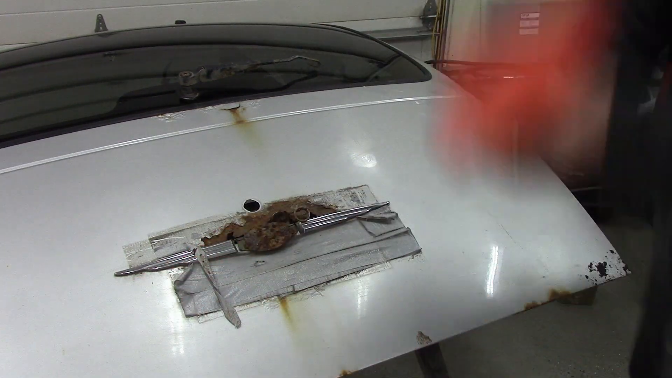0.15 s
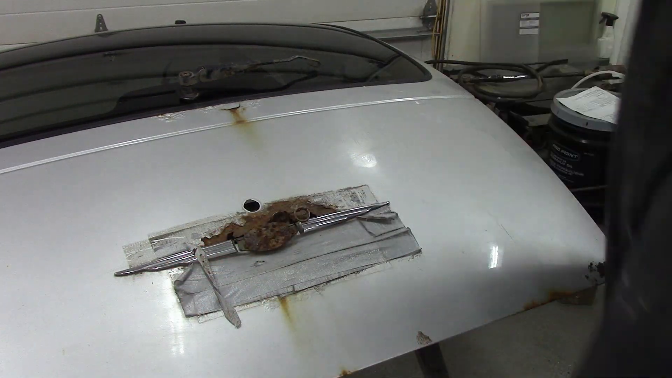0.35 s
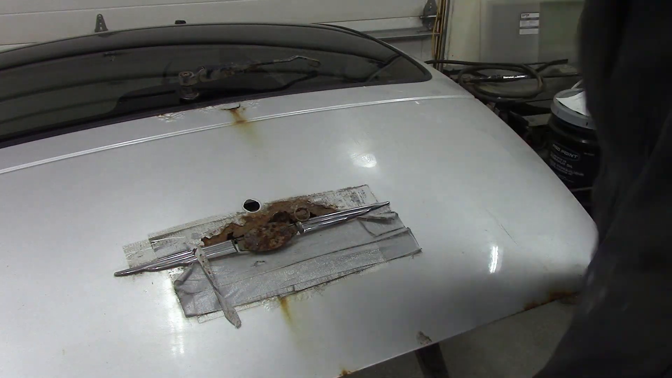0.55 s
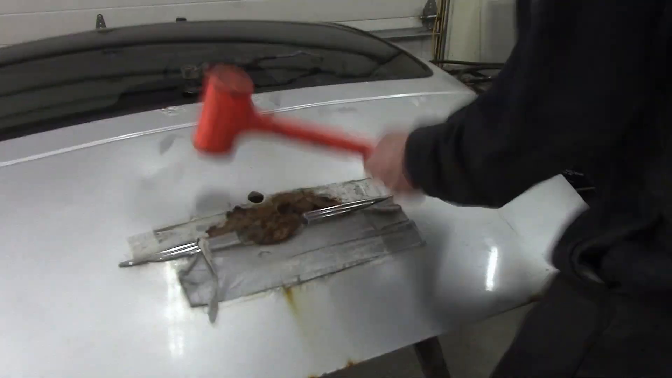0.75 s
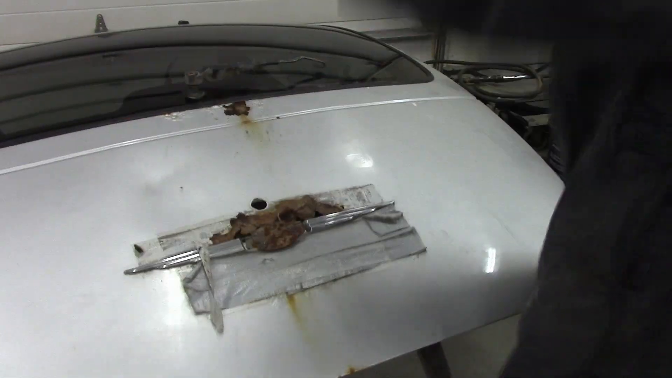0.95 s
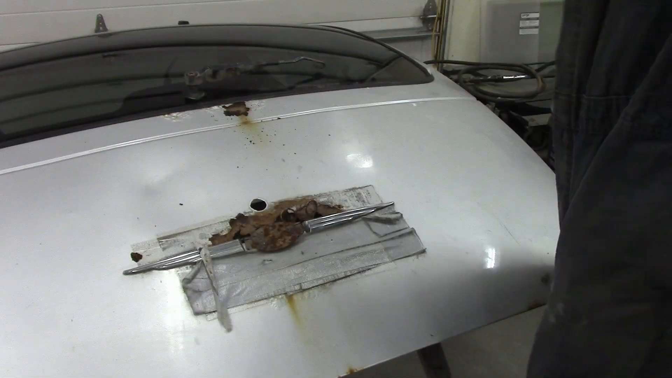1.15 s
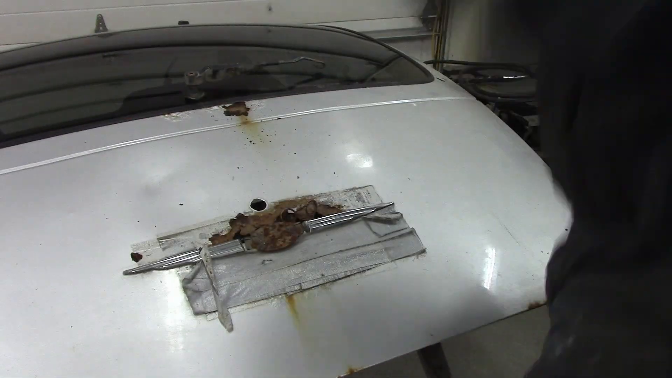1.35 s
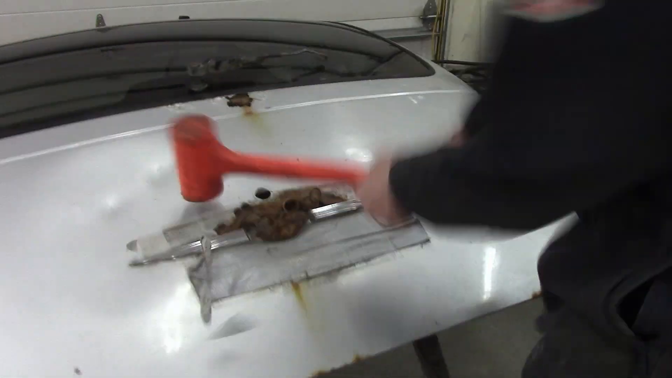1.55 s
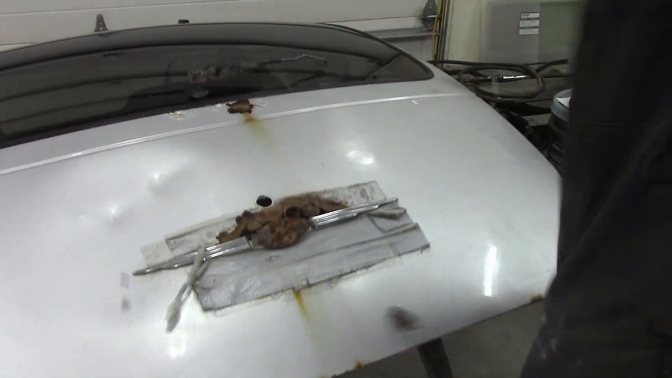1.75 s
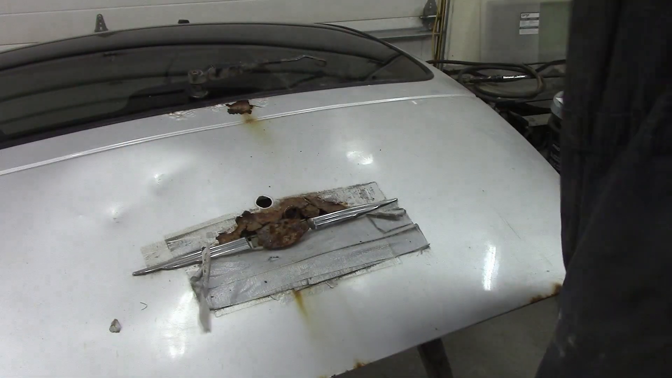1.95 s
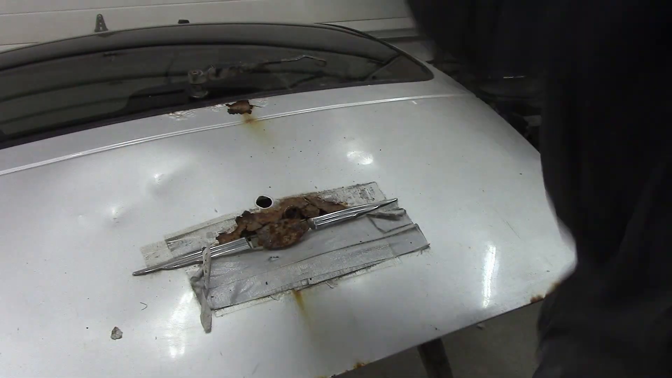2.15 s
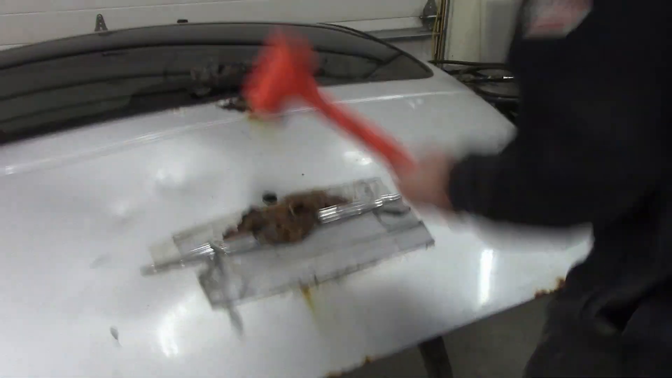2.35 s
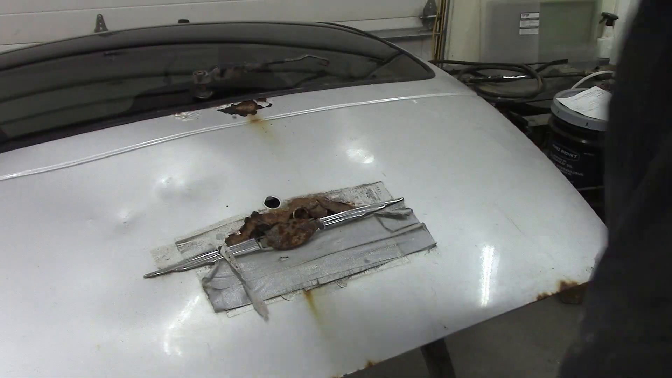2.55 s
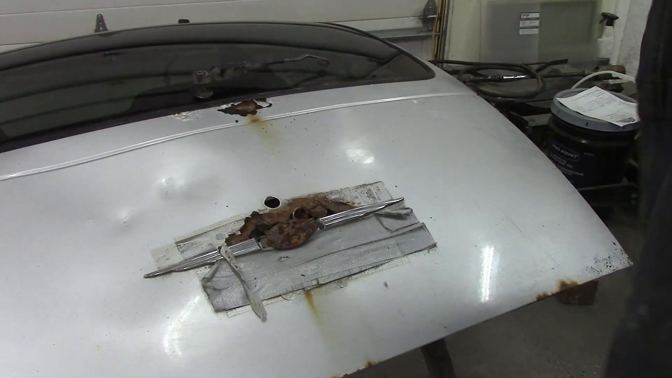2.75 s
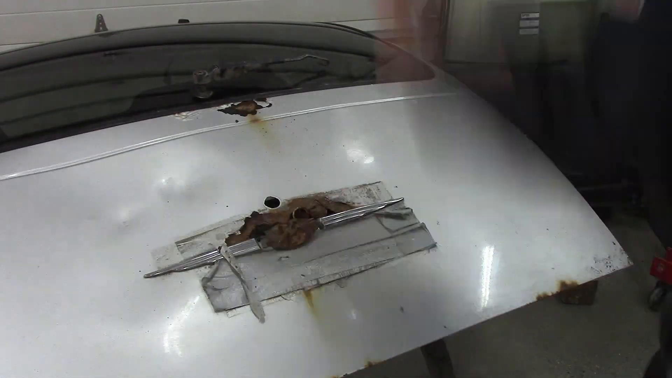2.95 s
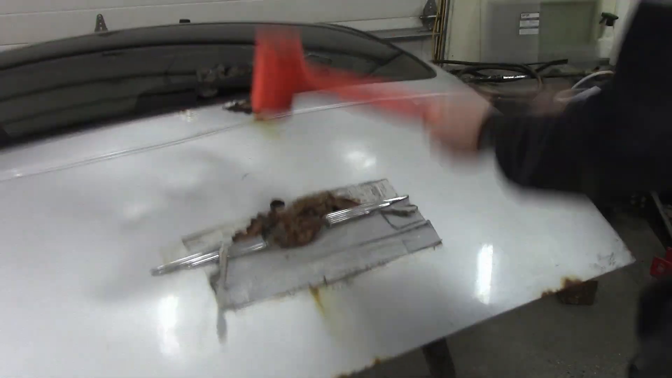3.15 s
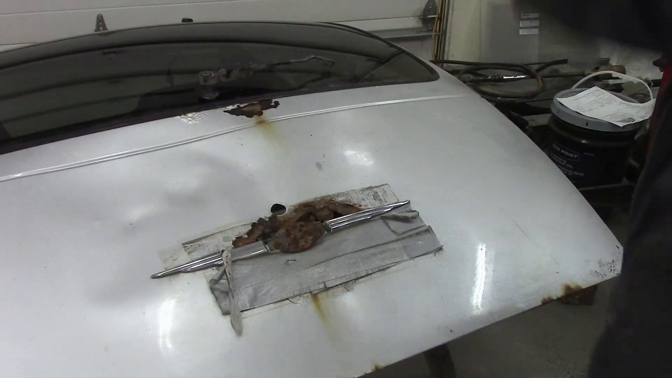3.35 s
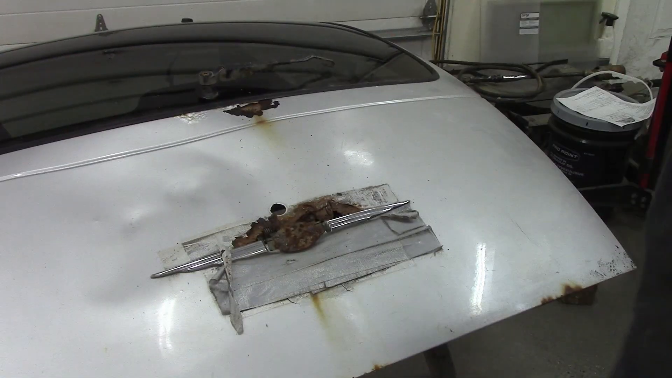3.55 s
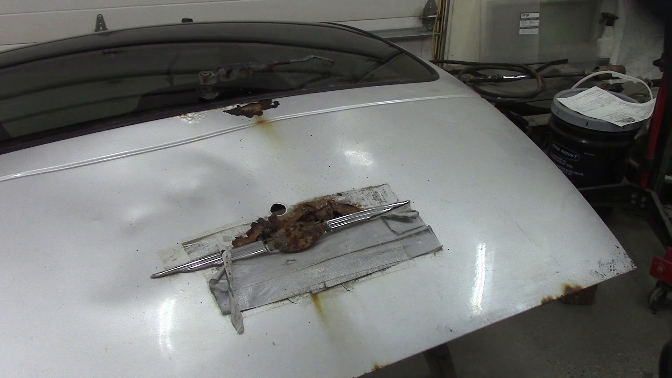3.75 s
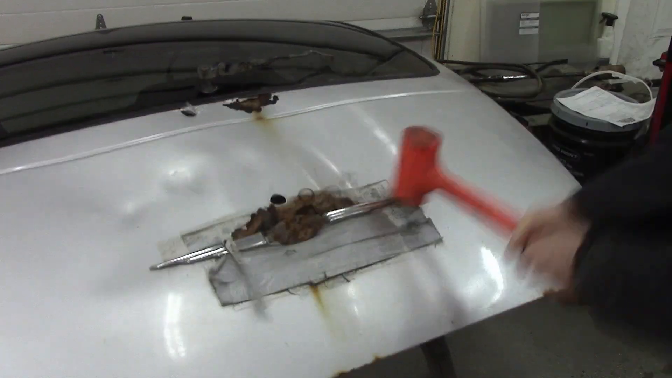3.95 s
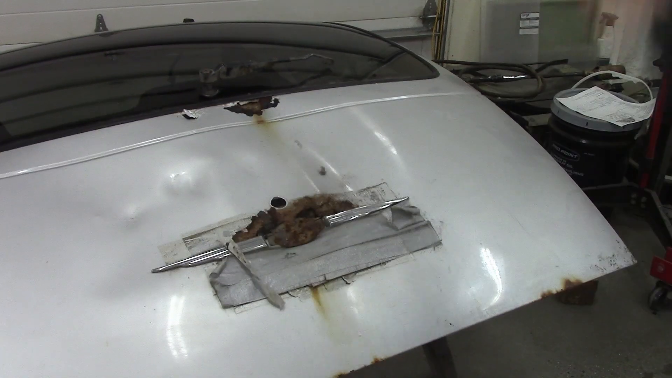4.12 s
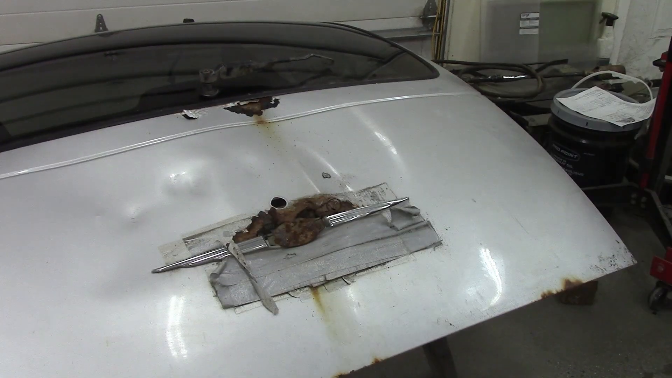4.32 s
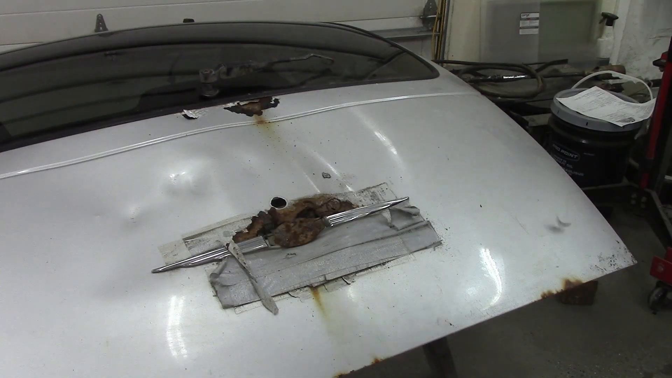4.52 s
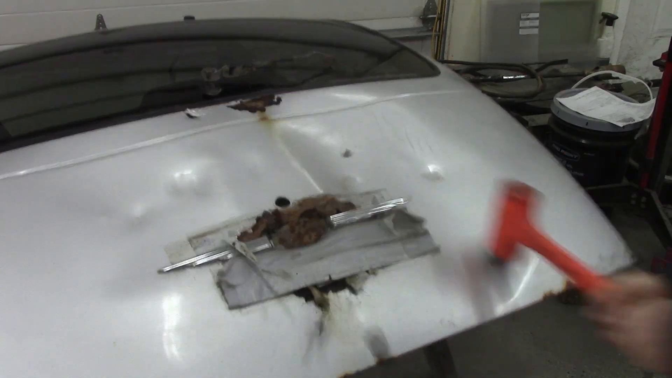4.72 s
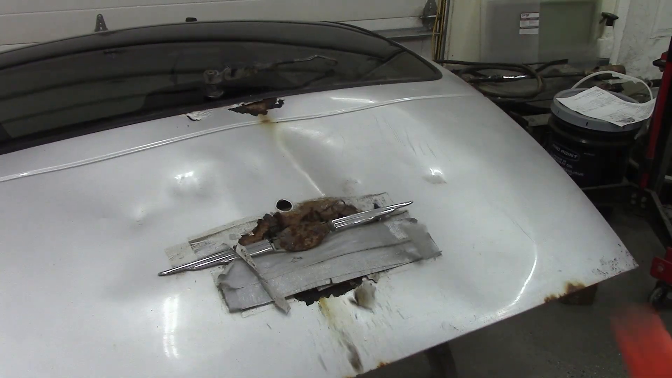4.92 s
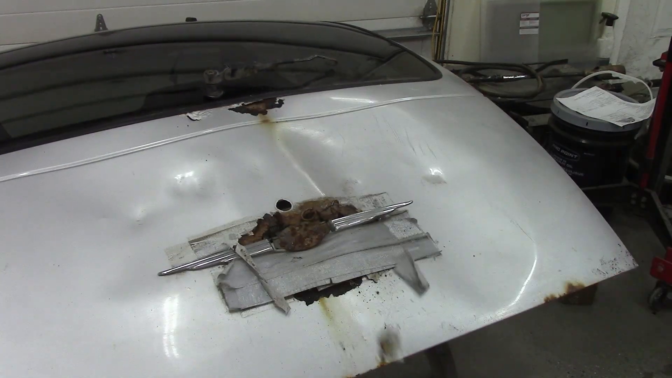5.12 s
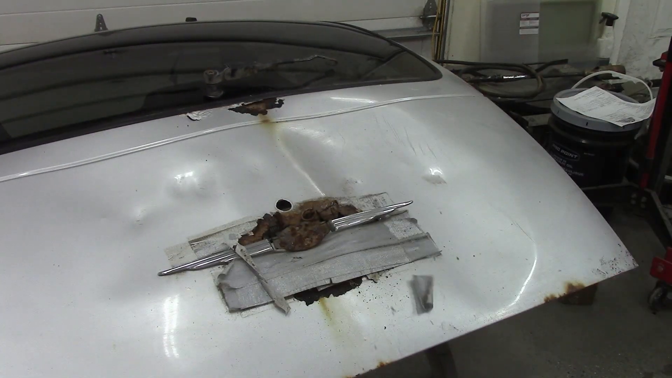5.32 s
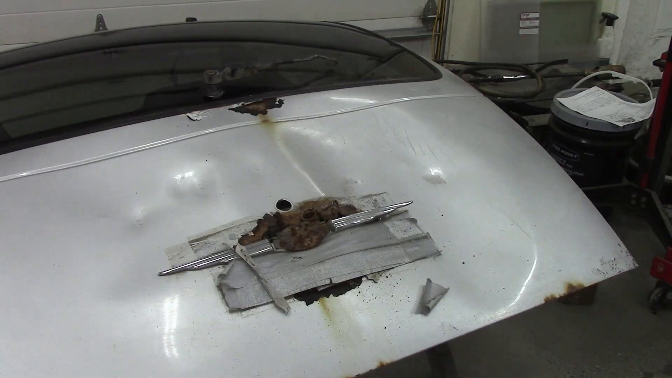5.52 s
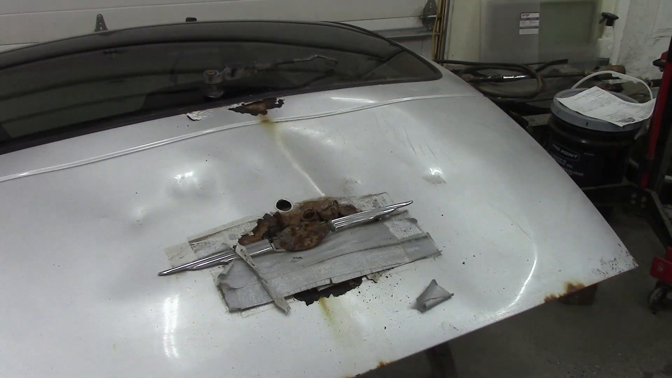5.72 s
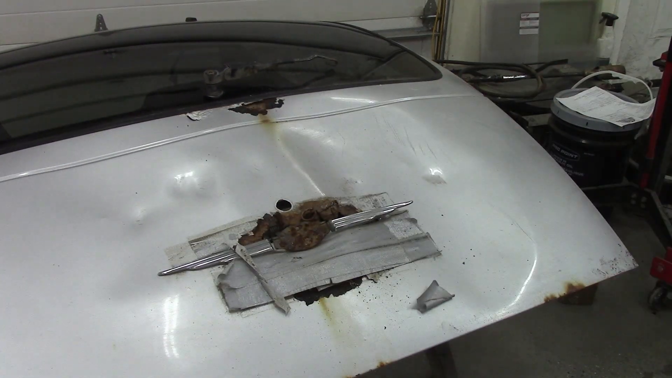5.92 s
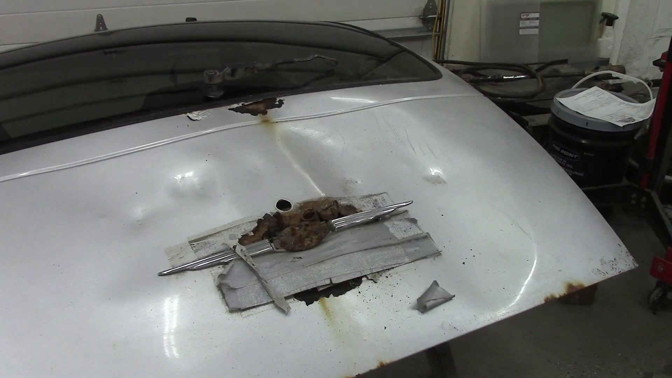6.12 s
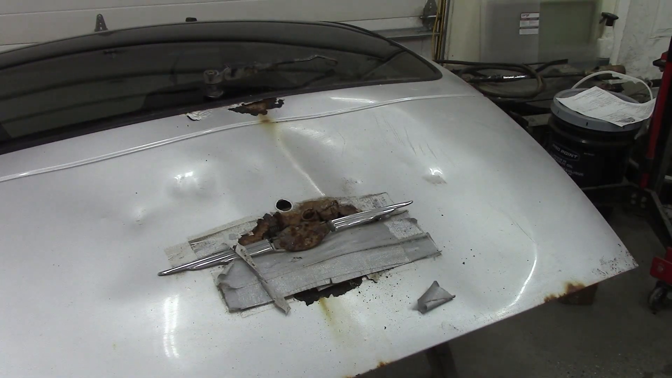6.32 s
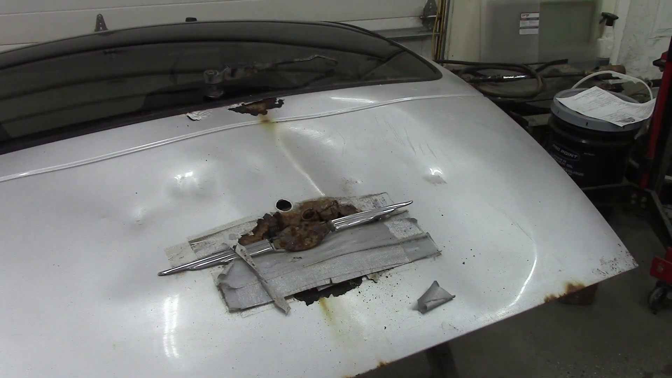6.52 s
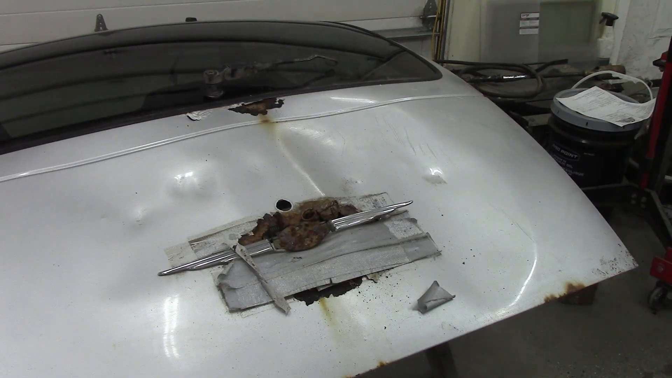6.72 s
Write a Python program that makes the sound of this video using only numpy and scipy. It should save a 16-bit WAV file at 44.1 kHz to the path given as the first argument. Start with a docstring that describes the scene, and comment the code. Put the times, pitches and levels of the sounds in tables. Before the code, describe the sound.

Six hard, evenly paced mallet blows clang on a car hood in an echoing workshop, then a loose piece bounces to rest.

```python
"""Six mallet blows on a sheet-metal car hood: each impact excites the panel's modes, which decay into
the reverberation of a hard-walled workshop. Chips and crumbs tick on the panel, and a loose part bounces
to rest afterwards. Soft bumps precede the work; clothes rustle and metal jingles over the room tone.
The first blow overloads the recorder, which then drops its gain, thins its bass and folds it to mono."""
import sys
import numpy as np
from scipy import signal
from scipy.io import wavfile
from scipy.ndimage import uniform_filter1d

SR = 44100
rng = np.random.default_rng(int(sys.argv[2]) if len(sys.argv) > 2 else 0)


def generate_wav(sig):
    """Save sig (samples, or channels by samples) to the path in sys.argv[1] as 16-bit PCM at SR."""
    pcm = np.round(np.clip(np.atleast_2d(sig).T, -1, 1) * 32767).astype(np.int16)
    wavfile.write(sys.argv[1], SR, pcm)


N = 298557

# mallet blows: start_s, strength_db, tilt_db_per_octave, dent_hz, dent_db, sheet_t60_factor
BLOWS = [(.682, 7.5, -1.5, 684, -20, 2.58), (1.4619, 5, 0, 1282, -16.5, 1.06),
         (2.245, 4, 0.06, 1798, -20, 1.28), (3.016, 3.5, 0, 1560, -16.5, 1.13),
         (3.8876, 4, 0.18, 753, -22, 1.19), (4.6555, 3.5, -1, 374, -9.5, 1.24)]
# clearest modes of the hood: pitch_hz, level_db, t60_s
HOOD_MODES = [(134.5, -4, .3), (187.9, -8.5, 0.24), (213, -7, 0.33), (286, 1.5, 0.8), (350.6, -3, 0.49),
              (434.5, 2.5, 0.58), (493, -3.5, .4), (616, -3.5, 0.16), (677, -5.5, 0.82), (768, -7, 1),
              (850, -2, .3), (1136, -5.5, 0.1), (1180, -6, 0.5), (1280, -10, 0.19), (1397, -6, 0.37),
              (1543, -4.5, 0.47), (1728, -1.5, 0.51), (1990, -16, .3), (2330, -8, 0.22),
              (2760, -15.5, 0.27), (3530, -15.5, 0.29), (3460, -15, 0.17)]
# its dense modes, too close to tell apart: frequency_hz, density_db
SHEET_SPECTRUM = [(40, -20.5), (90, -24), (200, 4.5), (450, 2), (1000, -2), (2000, -3), (3200, -5.5),
                  (4500, -12), (7000, -17.5), (10500, -22.5), (13000, -30), (16000, -38)]
# their base decay times: frequency_hz, t60_s
SHEET_DECAY = [(100, 0.17), (500, 0.27), (2000, .14), (6000, 0.14), (14000, 0.14)]
# a loose part bouncing to rest: start_s, peak_db, pitch_hz
BOUNCES = [(5.796, -29.5, 1300), (5.8024, -22, 1290), (5.8054, -19, 3500), (6.291, -27, 2960),
           (6.474, -36.5, 2780), (6.571, -47.5, 5450), (6.622, -60, 6500)]
# resonances of that part: centre_hz, half_width_hz, lift_db
PART_RESONANCES = [(1860, 38, 7), (3560, 130, 2)]
# soft bumps on the hood: start_s, peak_db, pitch_hz
BUMPS = [(.1, -66.5, 408), (.463, -62, 545), (.473, -62.5, 680)]
# chips landing on the panel: start_s, peak_db, pitch_hz
CHIPS = [(0.9004, -38, 11500), (0.9494, -44, 10000), (1.045, -45, 11000), (1.226, -48, 6800),
         (1.436, -50, 8700), (1.9196, -55, 10450), (2.1146, -49, 11350), (2.1839, -50, 6500),
         (2.6494, -55, 10900), (2.8845, -52, 11500), (3.218, -39, 9000), (3.599, -44, 7340),
         (3.7923, -54.5, 11900), (3.8584, -54, 7500), (4.457, -46, 7780), (5.069, -39.5, 9000),
         (5.1532, -56, 9400), (5.1744, -55, 10480), (5.24, -57, 7000), (5.3226, -48, 9000),
         (5.4268, -61, 10800), (5.4994, -61.5, 8500), (5.5245, -55, 8000), (5.5994, -55.5, 5500),
         (5.64, -64.5, 10500), (5.685, -64, 9470)]
# small metal parts shaken: start_s, gain_db, shake_length_s
JINGLES = [(0.198, -79.5, .016), (.533, -88, .052), (2.08, -75, .005), (2.115, -75, .005),
           (2.925, -75.5, .02), (4.579, -80, .005)]
# their modes: pitch_hz, level_db, t60_s
CLINK_MODES = [(7935, -5.5, .05), (9200, -9, .05), (10400, -4, .06), (11000, -1, 0.15), (11570, 0, 0.1),
               (12200, -7, 0.054), (13000, -9, .05), (14600, -14, .05)]
# movement of the clothes: time_s, level_db, tilt_db_per_octave
CLOTH_MOTION = [(0, -94, 8), (.1, -81.5, -0.6), (.3, -74, -0.5), (.36, -77.5, -0.5), (.44, -110, -2),
                (.47, -77.5, -0.2), (.55, -74.5, -1), (.62, -79.5, -2.5), (1.1, -76, 3.5), (2.1, -76, 2.5),
                (2.75, -80, 2.5), (3.4, -75.5, 3.5), (3.8, -76, -0.5), (4.35, -84, 3), (5.2, -77, 1.5),
                (5.55, -78, 0.1), (5.75, -92, 1.5)]
# cloth friction: frequency_hz, density_db
CLOTH_SPECTRUM = [(120, -39.5), (200, -9), (311, -2), (683, -6.5), (749, -5.5), (2650, -4.5), (3560, -6),
                  (5630, -5), (11300, -15), (16000, -32)]
# reverberation of the workshop: frequency_hz, t60_s
ROOM_DECAY = [(80, .7), (250, 0.93), (700, 1), (2000, 1), (3500, 1), (6000, 0.92), (10000, 0.55),
              (15000, 0.45)]
# room tone: frequency_hz, density_db
AIR_SPECTRUM = [(18, -52.5), (30, -18), (55, -14.5), (78, -3), (110, -10.5), (649, -1), (866, -2.5),
                (962, 1), (1040, -5.5), (1810, -3), (5310, -8.5), (6900, -12.5), (11100, -21), (14500, -28),
                (16000, -45)]
# stereo width: frequency_hz, side_gain_db
STEREO_WIDTH = [(30, -11.5), (130, -15), (290, -19), (640, -15.5), (1400, -17.5), (2800, -21.5),
                (5000, -16), (9000, -9), (15000, -14.5)]


def mallet_blow(strength_db, tilt_db, dent_hz, dent_db, t60_factor):
    """Impact excitation: a brief contact sets the sheet, its clear modes and the fresh dent ringing."""
    t = np.arange(round(.5 * SR)) / SR
    colour_db = lambda hz: lookup(SHEET_SPECTRUM, hz) + tilt_db * octaves(hz)
    decay_db = lambda hz, s: colour_db(hz) - 60 * s / (t60_factor * lookup(SHEET_DECAY, hz))
    panel = shaped(rng.standard_normal((2, len(t))), decay_db, size=512)
    panel[0] += gain(-27) * ringing(HOOD_MODES, t) + gain(dent_db) * ringing([(dent_hz, 0, .12)], t)
    panel[0] += gain(-15.5 - 60 * t / .088) * np.sin(2 * np.pi * 132 * t)  # the whole hood flexes
    panel *= 1 - np.exp(-t / .00091)
    panel += tap(-7, 3000, t60_s=.007, q=.55, samples=len(t)) * [[1], [.4]]  # the crack of contact
    sound = gain(-9.5) * reverberation(colour_db, rise_s=.013)
    add(sound, 0, panel)
    return gain(strength_db) * sound


def ringing(modes, t):
    """Modal superposition: damped sines vary in level and slightly in pitch, as if struck at a new spot."""
    scatter = rng.standard_normal((len(modes), 2))
    return sum(gain(db + 3.2 * louder - 60 * t / t60_s) * np.sin(2 * np.pi * hz * (1 + .015 * detune) * t)
               for (hz, db, t60_s), (louder, detune) in zip(modes, scatter))


def tap(peak_db, hz, t60_s, q, samples=3500):
    """Resonant filtering: a contact is a decaying noise burst through one broad peak, as mid and side."""
    t = np.arange(samples) / SR
    burst = rng.standard_normal((2, samples)) * gain(-60 * t / t60_s)
    resonance = signal.iirpeak(hz, max(q, hz / 15000), SR)
    body = signal.lfilter(*resonance, signal.lfilter(*resonance, burst))
    return gain(peak_db) * body / abs(body[0]).max()


def knock(peak_db, hz, echo_db, tilt_db, t60_s, resonances=()):
    """Coupled vibration: a tap shakes the sheet, whose spectrum colours the echo of the room."""
    lift_db = lambda f: sum(db / (1 + ((f - centre) / width) ** 2) for centre, width, db in resonances)
    colour_db = lambda f: lookup(SHEET_SPECTRUM, f) + tilt_db * octaves(f) + lift_db(f)
    sound = gain(peak_db + echo_db) * reverberation(colour_db, rise_s=.0009)
    add(sound, 0, tap(peak_db, hz, t60_s, q=.75))
    return sound


def chips(rebound_s=.012, rebound_db=-8):
    """Inelastic rebound: each chip ticks on the panel and skips once more, fainter."""
    out = np.zeros((2, N))
    for start_s, peak_db, hz in CHIPS:
        add(out, start_s, tap(peak_db, hz, t60_s=.014, q=1.4))
        skip_s = start_s + rebound_s * (.5 + rng.random())
        add(out, skip_s, tap(peak_db + rebound_db, hz, t60_s=.014, q=1.4))
    return out


def crumbs(per_blow=70, settle_s=.95, faintest_db=-76.5):
    """Random impacts: each blow throws up crumbs of chance size and pitch that patter back down."""
    out = np.zeros((2, N))
    for start_s, *_ in BLOWS:
        for delay, size, pitch in rng.random((per_blow, 3)):
            tick = tap(faintest_db + 18 * size ** 3, 6500 + 5500 * pitch, t60_s=.016, q=1.8)
            add(out, start_s + settle_s * delay, tick)
    return out


def jingle(gain_db, length_s, gap_s=.007):
    """Collision and friction: small metal parts clink unevenly, each a soft ring over a brief rub."""
    t = np.arange(4000) / SR
    out = np.zeros(round(length_s * SR) + 5000)
    for delay_s in np.arange(0, length_s, gap_s):
        clink = ringing(CLINK_MODES, t) * (1 - np.exp(-t / .0006))
        rub = tap(13, 10500, t60_s=.09, q=1.3, samples=len(t))[0]
        jitter_s = gap_s * rng.random() * (delay_s > 0)
        add(out, delay_s + jitter_s, (clink + rub) * gain(-90 * delay_s))
    return gain(gain_db) * out


def rustle(swish_db=4, lead_s=.11, width_s=.07):
    """Friction noise: cloth rubs in patches, and the sleeve swishes before each blow after the first."""
    times_s, level_db, tilt_db = np.transpose(CLOTH_MOTION)
    patches = rng.standard_normal((129, N // 64 + 2))
    patches = unit_rms(uniform_filter1d(uniform_filter1d(patches, 8, axis=0), 14, axis=1))
    creases = unit_rms(uniform_filter1d(rng.standard_normal(N // 64 + 2), 18))  # folds catch and let go
    spectrum_rms = np.sqrt(np.mean(gain(lookup(CLOTH_SPECTRUM, np.fft.rfftfreq(256, 1 / SR))) ** 2))

    def friction_db(hz, t):
        colour_db = lookup(CLOTH_SPECTRUM, hz) + np.interp(t, times_s, tilt_db) * octaves(hz)
        sleeve_db = sum(swish_db * np.exp(-((t - hit_s + lead_s) / width_s) ** 2)
                        for hit_s, *_ in BLOWS[1:])
        texture_db = 1.4 * patches[:, :len(t)] + 1.9 * creases[:len(t)]
        return np.interp(t, times_s, level_db) + colour_db + sleeve_db + texture_db

    return shaped(rng.standard_normal((2, N)), friction_db) / spectrum_rms


def reverberation(colour_db, rise_s):
    """Diffuse field: the walls return the source's broad colour in decaying clumps, as mid and side."""
    noise = rng.standard_normal((2, round(1.5 * SR)))
    clumps_db = rng.standard_normal((257, 600))
    clumps_db = unit_rms(uniform_filter1d(uniform_filter1d(clumps_db, 5, axis=0), 10, axis=1))
    reflected_db = lambda hz: colour_db(hz) - 2.8 * np.maximum(octaves(hz) - 1.3, 0)  # clutter dulls it
    tail_db = lambda hz, t: reflected_db(hz) + clumps_db[:, :len(t)] - 60 * t / lookup(ROOM_DECAY, hz)
    tail = shaped(noise, tail_db, size=512)
    return tail * (1 - np.exp(-np.arange(tail.shape[1]) / SR / rise_s))


def room_tone(level_db=-81):
    """Stationary noise: the steady air of the workshop."""
    air = shaped(rng.standard_normal((2, N)), lambda hz, t: lookup(AIR_SPECTRUM, hz), size=2048)
    return gain(level_db) * unit_rms(air)


def gain(db):
    """Amplitude ratio of a level in decibels."""
    return 10 ** (np.asarray(db) / 20)


def unit_rms(x):
    """Normalisation to unit power."""
    return x / np.sqrt(np.mean(x ** 2) + 1e-20)


def lookup(table, hz):
    """Interpolation on a log-frequency axis."""
    table_hz, values = np.transpose(table)
    return np.interp(np.log(hz + 1), np.log(table_hz + 1), values)


def octaves(hz):
    """Logarithmic distance from the middle of the audible range."""
    return np.log2((hz + 40) / 1500)


def add(mix, start_s, sound):
    """Superposition of a delayed sound on the mix."""
    part = mix[..., round(start_s * SR):][..., :sound.shape[-1]]
    part += sound[..., :part.shape[-1]]


def shaped(x, db_of, size=256):
    """Time-varying filtering: db_of(hz, t) weights the short-time spectra."""
    frames = dict(fs=SR, nperseg=size, noverlap=size * 3 // 4)
    hz, t, spectra = signal.stft(x, **frames)
    return signal.istft(spectra * gain(db_of(hz[:, None], t)), **frames)[1][..., :x.shape[-1]]


def smoothed(x, lag_s):
    """First-order lag with time constant lag_s."""
    pole = np.exp(-1 / (lag_s * SR))
    return signal.lfilter([1 - pole], [1, -pole], x)


def highpass(x, hz, order=1):
    """Attenuation below a cutoff frequency."""
    return signal.lfilter(*signal.butter(order, hz, "high", fs=SR), x)


def scene():
    """Mid-side stereo: the sources add linearly, then spread to the two microphone ports."""
    mix = rustle() + room_tone() + crumbs()
    for start_s, *stroke in BLOWS:
        add(mix, start_s, mallet_blow(*stroke))
    mix += chips()
    for start_s, gain_db, length_s in JINGLES:
        add(mix[0], start_s, jingle(gain_db, length_s))
    for start_s, peak_db, hz in BUMPS:
        add(mix, start_s, knock(peak_db, hz, echo_db=-11.5, tilt_db=-2.6, t60_s=.11))
    for start_s, peak_db, hz in BOUNCES:
        bounce = knock(peak_db, hz, echo_db=-14.5, tilt_db=.5, t60_s=.011, resonances=PART_RESONANCES)
        add(mix, start_s, bounce)
    mid = mix[0]
    side = shaped(mix[1], lambda hz, t: lookup(STEREO_WIDTH, hz), size=1024)
    side -= .1 * signal.lfilter(*signal.butter(1, 500, fs=SR), mid)  # the right port takes more bass
    return np.array([mid + side, mid - side])


def record(dry, quiet_gain_db=40, trigger_db=-30, limit_db=-11, band_limit_hz=16360):
    """Automatic gain control: at the first loud sound the gain drops and a filter glides in that thins
    the bass and folds it to mono; limiting, clipping and a band limit follow."""
    miked = highpass(dry, 110, order=2)
    triggered = 1. * (np.maximum.accumulate(abs(miked).max(0)) > gain(trigger_db))
    since_trigger_s = np.cumsum(triggered) / SR
    unfiltered = np.clip(1 - (since_trigger_s - .06) / .5, 0, 1) ** .59
    mid, side = (miked[0] + miked[1]) / 2, (miked[0] - miked[1]) / 2
    thin_mid = highpass(highpass(mid, 1100), 150)
    thin_side = signal.sosfiltfilt(signal.butter(7, 2900, "high", fs=SR, output="sos"), side)
    mid = thin_mid + unfiltered * (mid - thin_mid)
    side = thin_side + unfiltered ** 1.9 * (side - thin_side)
    excess_db = np.maximum(10 * np.log10(smoothed(mid ** 2, lag_s=.013) + 1e-12) - limit_db, 0)
    gain_db = quiet_gain_db * (1 - smoothed(triggered, lag_s=.00095)) - .92 * excess_db
    out = np.array([mid + side, mid - side]) * gain(gain_db)
    out = np.clip(out + .013 * out ** 2, -1, 1)  # a slightly lopsided amplifier adds a deep thump
    lowpass = signal.firwin(511, band_limit_hz, window=("kaiser", 12), fs=SR)
    return signal.oaconvolve(out, lowpass[None], "same")


dry = scene()
out = record(dry)
generate_wav(out)
```